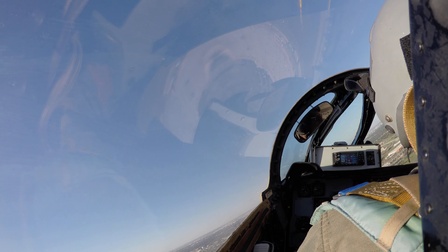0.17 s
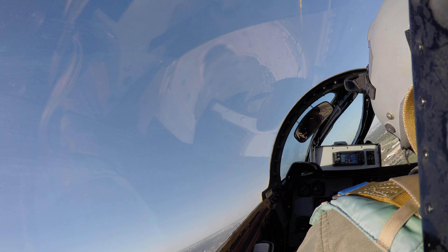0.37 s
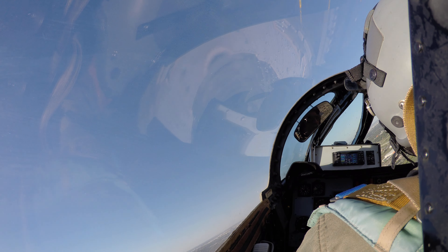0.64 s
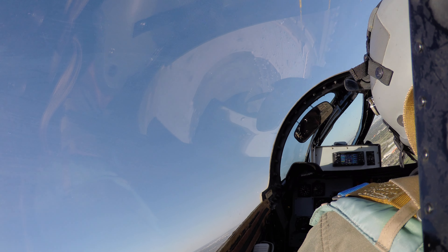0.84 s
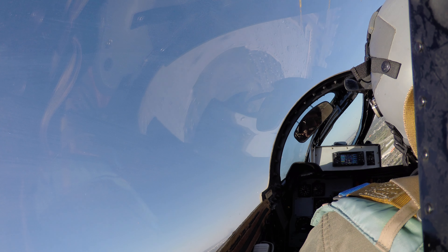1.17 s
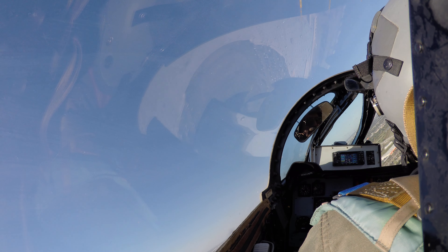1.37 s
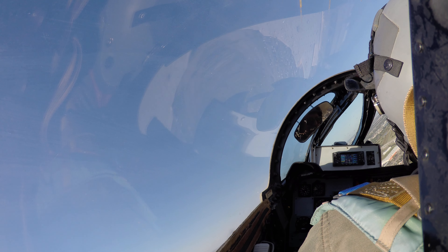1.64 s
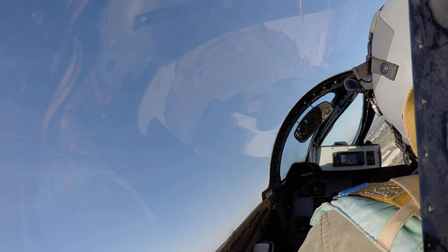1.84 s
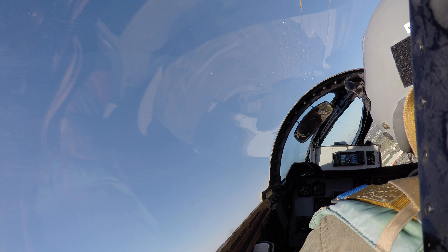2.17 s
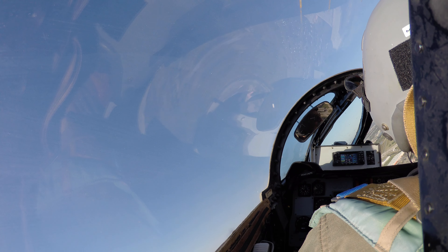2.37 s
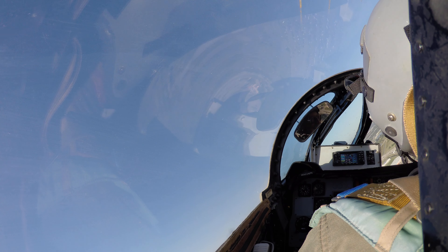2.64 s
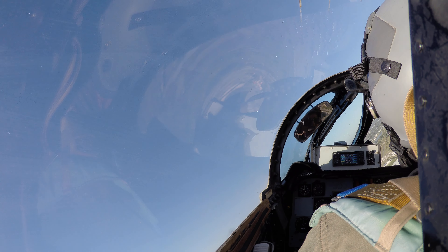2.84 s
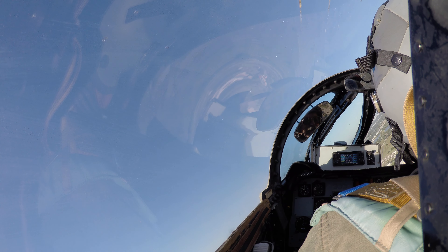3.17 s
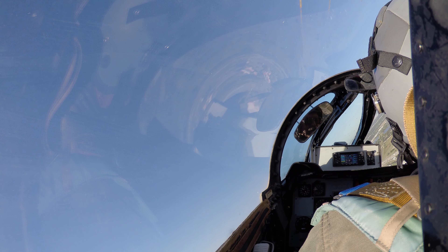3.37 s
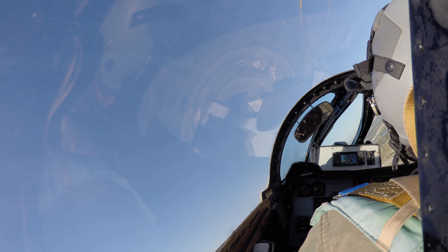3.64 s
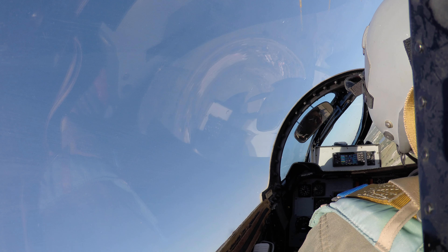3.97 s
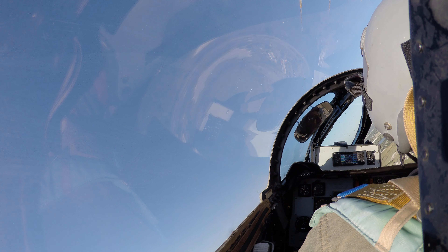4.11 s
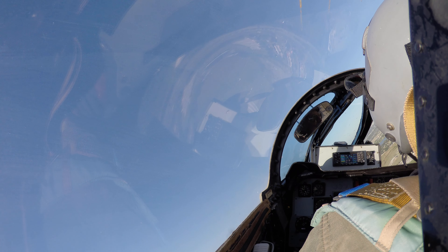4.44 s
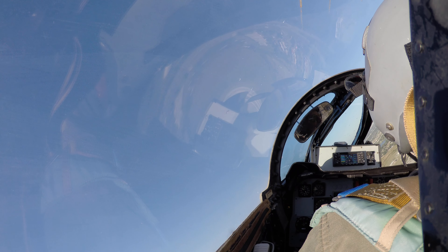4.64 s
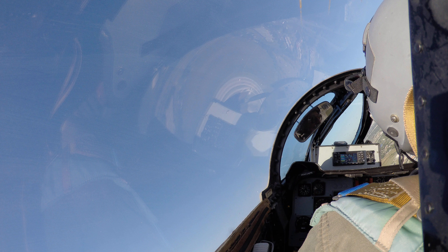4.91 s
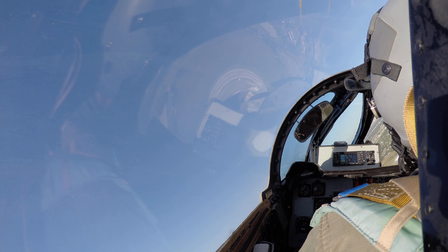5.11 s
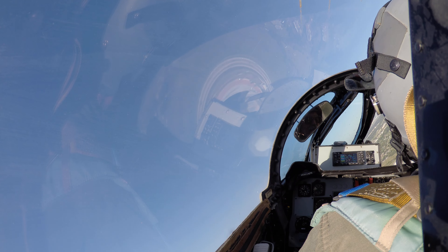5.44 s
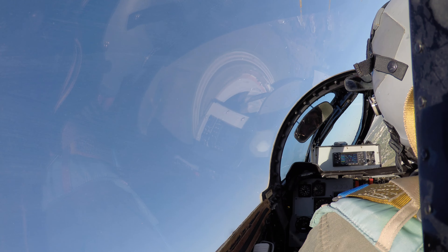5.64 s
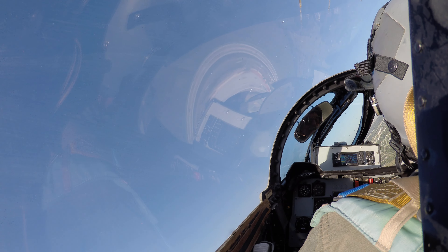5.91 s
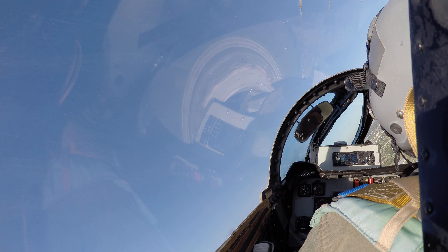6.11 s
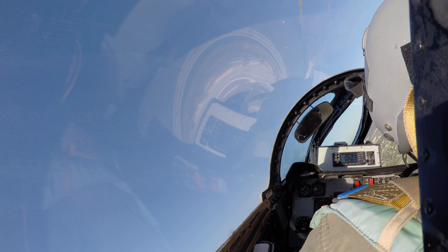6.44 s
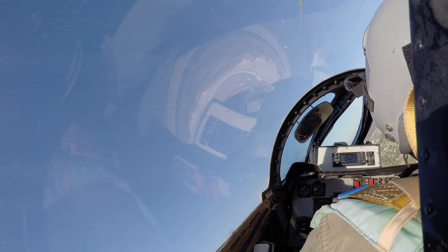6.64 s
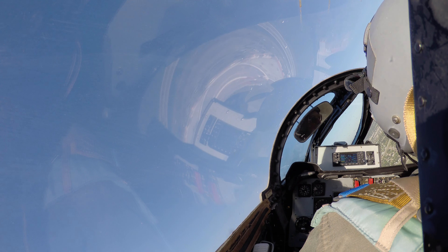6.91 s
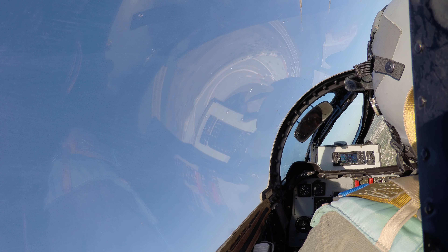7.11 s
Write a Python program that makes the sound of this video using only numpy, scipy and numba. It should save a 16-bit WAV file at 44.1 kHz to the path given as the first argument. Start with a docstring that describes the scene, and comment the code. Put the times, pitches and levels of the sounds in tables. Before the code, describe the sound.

In a small jet cockpit during a banked turn, smooth dense air rush fills everything, coloured by a narrow, ringing upper-mid band. A steady whine swells in at once and slowly weakens, with lower and higher engine tones beside it. Underneath, very deep airframe boom and buffeting throb unevenly. The microphone sits in a hard case behind the pilot, boxy and close, with no voices.

```python
"""Inside a jet cockpit in a banked turn; a small camera's microphone in a hard case behind the pilot.
The pump whine and airframe boom swell in first, over canopy air that settles in about a second and
rings the case near 2.6 kHz. Shaft tones sing on, dipping twice late, while the 33 Hz boom beats with
a hum near 42 Hz; the boom's level wanders irregularly throughout.
Sines make the tones, shaped noise the air and buffeting; gain control leans on the booms."""
import sys
import numpy as np
from scipy import signal
from scipy.fft import rfft, irfft
from scipy.io import wavfile
from scipy.ndimage import uniform_filter1d, minimum_filter1d
from numba import njit

SR = 44100
rng = np.random.default_rng(int(sys.argv[2]) if len(sys.argv) > 2 else 0)


def generate_wav(signal):
    """Clip the signal to [-1, 1] and save it as 16-bit WAV at the path in sys.argv[1]."""
    frames = np.transpose(np.atleast_2d(signal))
    scaled = np.clip(frames, -1, 1) * 32767
    pcm = np.round(scaled).astype(np.int16)
    wavfile.write(sys.argv[1], SR, pcm)


N = 321048
T = np.arange(N) / SR  # time of each sample [s]


def undb(db):
    """Decibels to amplitude gain."""
    return 10 ** (np.asarray(db) / 20)


def level_curve(table):
    """Level at every sample, in straight lines between the points of a time table."""
    times, levels = np.transpose(table)
    return np.interp(T, times, levels)


def tone(hz, db):
    """Sine of moving pitch at an rms level, from a random point of its cycle."""
    cycles = rng.random() + np.cumsum(hz + 0 * T) / SR
    return np.sqrt(2) * undb(db) * np.sin(2 * np.pi * cycles)


def walk(rate):
    """Slow random wander: levels held 1 / rate seconds, smoothed twice; mean 0, spread 1."""
    hold = int(SR / rate)
    steps = np.repeat(rng.standard_normal(N // hold + 1), hold)
    wander = uniform_filter1d(uniform_filter1d(steps, hold), hold)[:N]
    return (wander - wander.mean()) / wander.std()


def coloured_noise(spectrum, modes):
    """Noise of rms 1 with a broad spectrum and bell-shaped resonances or dips on it."""
    hz = np.maximum(np.arange(N // 2 + 1) * SR / N, 1)
    points, levels = np.transpose(spectrum)
    db = np.interp(np.log(hz), np.log(points), levels)
    for centre, width, height in modes:
        db = db + height * np.exp(-.5 * (2 * (hz - centre) / width) ** 2)
    noise = irfft(rfft(rng.standard_normal(N)) * undb(db), N)
    return noise / noise.std()


@njit
def follow(x, attack, release, start):
    """Envelope that rises fast and falls slowly."""
    out, level = np.empty(len(x)), start
    for i in range(len(x)):
        size = abs(x[i])
        level += (size - level) * (attack if size > level else release)
        out[i] = level
    return out


def pump():
    """The pump's whine swells in, then sags slowly while its pitch and level wander."""
    level_db, sag_db_per_s = -34, 0.49
    swell_db, swell_s = 16, .22
    hz = 1136.8 + .9 * walk(3)
    db = level_db - sag_db_per_s * T - swell_db * np.exp(-(T / swell_s) ** 2)
    flutter_db = 1.1 * walk(3.2) + 1.05 * walk(12)
    return tone(hz, db + flutter_db)


# tones of the turning shaft: (multiple of shaft speed, level [dB re the first])
SHAFT_TONES = [(1, 0), (3, -27), (9, -22), (15, -22), (27, -4)]
# level of the first shaft tone, which the others follow: (time [s], level [dB rms])
SHAFT_LEVEL = [(0.0, -36), (0.06, -31.5), (3.42, -31.5), (3.59, -30), (5.09, -37.5), (5.31, -31),
               (5.52, -37.5), (5.86, -32), (7.28, -36)]


def shaft():
    """Tones at whole multiples of one slowly drifting shaft speed, each wavering in level."""
    speed_hz = 94.57 * (1 + .0004 * walk(1.5))
    tones = sum(tone(multiple * speed_hz, db + 1.3 * walk(2.3)) for multiple, db in SHAFT_TONES)
    return undb(level_curve(SHAFT_LEVEL)) * tones


# air rush as it comes through the case: (frequency [Hz], relative level [dB per Hz])
RUSH_SPECTRUM = [(300, -30.8), (760, -27.6), (980, -19.5), (1850, -19.2), (2240, -19.0), (2500, 0.0),
                 (2820, -8.0), (3630, -9.5), (3820, -28.0), (6840, -26.8), (7120, -31.9), (13030, -41.2),
                 (13540, -47.0), (15250, -50.2)]
# cockpit and case resonances and dips: (frequency [Hz], width [Hz], level over the rush [dB])
CASE_MODES = [(367, 73, 5.4), (531, 75, 6.8), (650, 90, 3.0), (750, 36, -3.0), (969, 25, 2.8),
              (1280, 79, 4.3), (1406, 20, 3.1), (1779, 41, -3.5), (2211, 160, 6.0), (2299, 48, -4.6),
              (2596, 75, 2.3), (2744, 140, 4.7), (2964, 34, 4.0), (3086, 60, -3.1), (3470, 30, 4.5),
              (4036, 200, 3.7), (4418, 170, 3.6), (4637, 75, -3.0), (4719, 140, 4.1), (5106, 350, 4.4),
              (5651, 110, 3.6), (6009, 270, 4.3), (6664, 48, 3.4), (7560, 150, 2.2), (8775, 87, -2.3),
              (9045, 79, -2.0), (9450, 600, 1.6), (10700, 400, 2.0), (11880, 200, 4.5), (14093, 420, 2.6)]


def air_rush():
    """Smooth dense hiss of air over the canopy; starts a little louder, settles and wavers."""
    settled_db, extra_db, settle_s = -17, 1, 1.1
    db = settled_db + extra_db * np.exp(-T / settle_s)
    return undb(db + 0.5 * walk(9)) * coloured_noise(RUSH_SPECTRUM, CASE_MODES)


# hums in the airframe: (frequency [Hz], mean level [dB rms])
HUM_TONES = [(41.87, -21.3), (66.35, -38)]


def hums():
    """Airframe hums of fixed pitch, wavering slightly in level."""
    return sum(tone(hz, db + .8 * walk(2.5)) for hz, db in HUM_TONES)


# buffeting of the airframe under the boom: (frequency [Hz], relative level [dB per Hz])
BUFFET_SPECTRUM = [(10, -40), (17, -31), (28, -9), (33, -5), (44, -1), (52, -7), (67, -10), (73, -21),
                   (100, -23), (124, -25), (136, -40), (250, -40), (290, -39), (1500, -100)]
# airframe panels shaken by it: (frequency [Hz], width [Hz], level over the buffeting [dB])
PANEL_MODES = [(38, 2.5, 4), (46, 2, 3), (84, 10, -1.5), (111, 7, 10), (171, 20, 13), (222, 20, 3),
               (275, 24, 9)]
# strength of the buffeting: (time [s], level [dB rms])
BUFFET_LEVEL = [(0.0, -20.5), (7.28, -23)]


def buffeting():
    """Low noise shakes the airframe, and its panels resonate."""
    return undb(level_curve(BUFFET_LEVEL)) * coloured_noise(BUFFET_SPECTRUM, PANEL_MODES)


# one chance course of the boom's random level: (time [s], level [dB rms])
BOOM_LEVEL = [(0.0, -32), (0.18, -16), (1.82, -17.5), (2.07, -21), (2.19, -19), (2.57, -17.5), (2.7, -41),
              (2.8, -20.5), (3.57, -18), (3.67, -28), (4.22, -17), (4.91, -16.5), (5.01, -12.5),
              (5.29, -22.5), (5.43, -12.5), (6.04, -24.5), (6.3, -13.5), (7.28, -18.5)]


def boom():
    """The airframe's lowest bending mode: a sine of wandering pitch and irregular level."""
    hz = 32.9 + .9 * walk(4)
    return tone(hz, level_curve(BOOM_LEVEL))


def scene():
    """All of it reaches the one microphone in the case."""
    engine = pump() + shaft()
    airframe = hums() + buffeting() + boom()
    return (engine + air_rush() + airframe)[None]


def record(dry, usual=0.44, ratio=1.41, attack_s=0.02, release_s=0.31, top_hz=15295):
    """Gain control ducks after loud booms, a limiter holds the highest peaks and the top is cut."""
    envelope = follow(dry[0], 1 / (attack_s * SR), 1 / (release_s * SR), usual)
    envelope = uniform_filter1d(envelope, size=200)
    held = dry * (usual / envelope) ** (1 - 1 / max(ratio, 1))
    # the limiter looks a few milliseconds ahead, so its gain moves without clicks
    room = np.minimum(1, .88 / (np.abs(held) + 1e-9))
    limiter_gain = uniform_filter1d(minimum_filter1d(room, size=401), size=401)
    top_cut = signal.ellip(16, .2, 90, top_hz, fs=SR, output="sos")
    return signal.sosfilt(top_cut, held * limiter_gain)


dry = scene()
out = record(dry)
generate_wav(out)
```